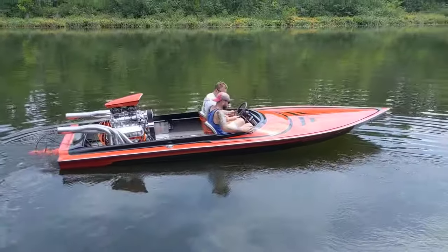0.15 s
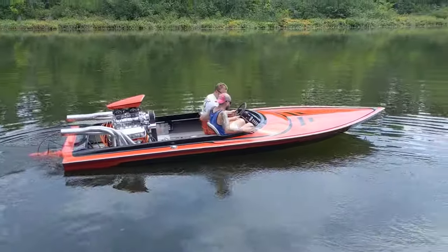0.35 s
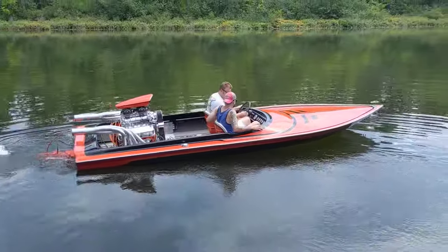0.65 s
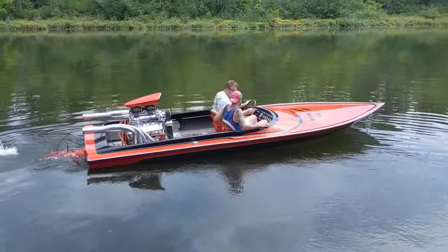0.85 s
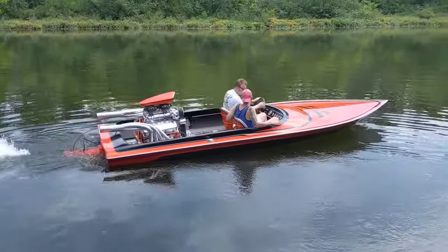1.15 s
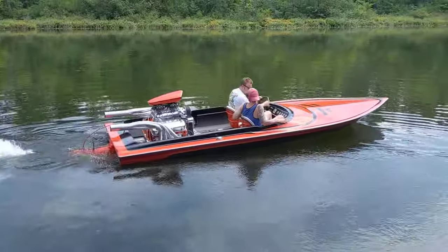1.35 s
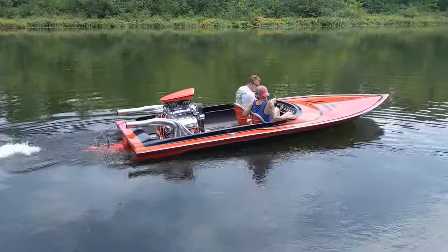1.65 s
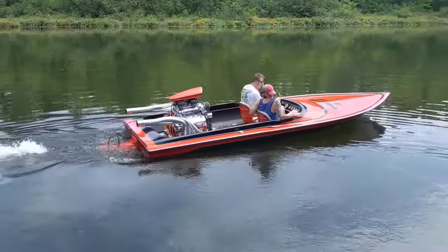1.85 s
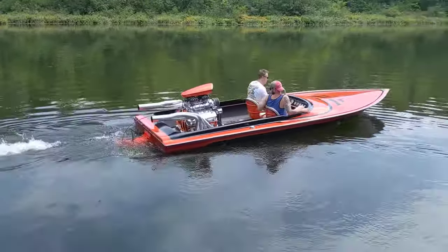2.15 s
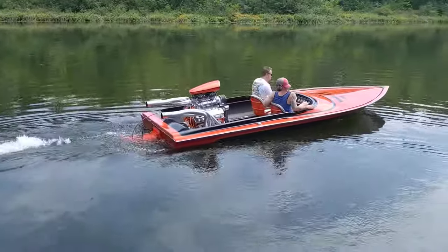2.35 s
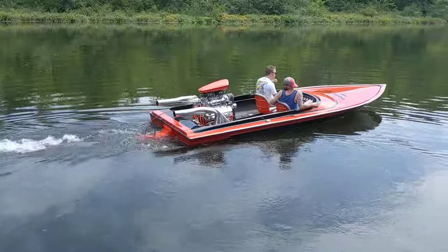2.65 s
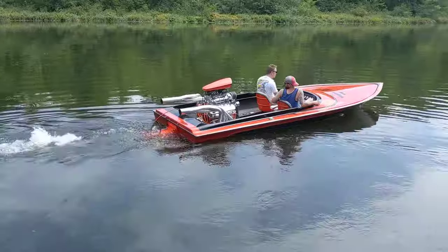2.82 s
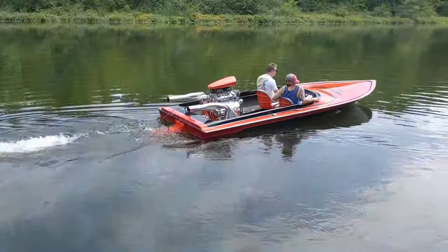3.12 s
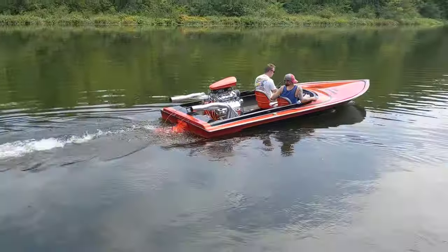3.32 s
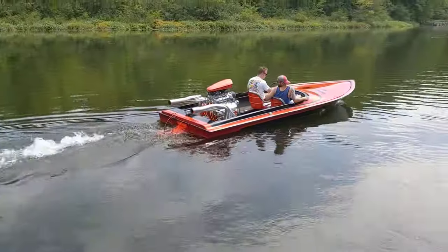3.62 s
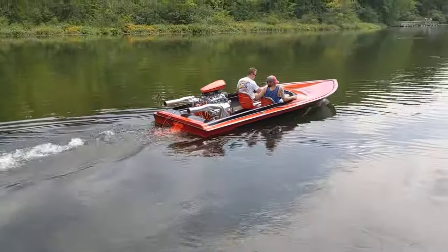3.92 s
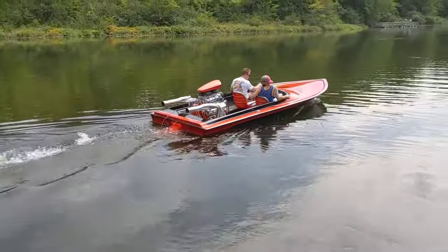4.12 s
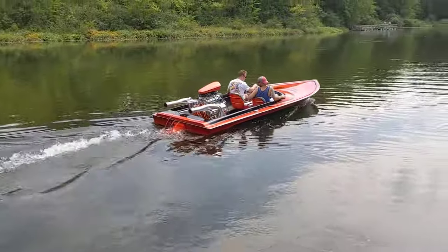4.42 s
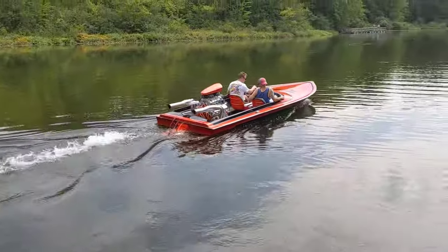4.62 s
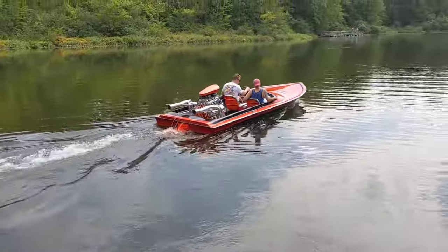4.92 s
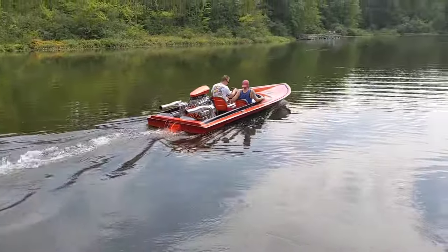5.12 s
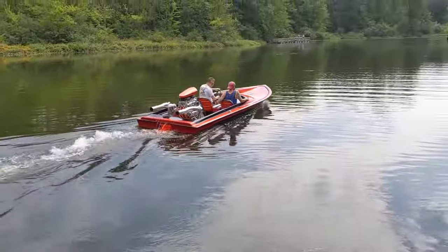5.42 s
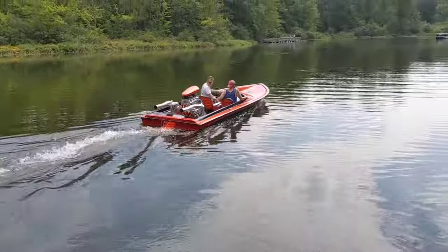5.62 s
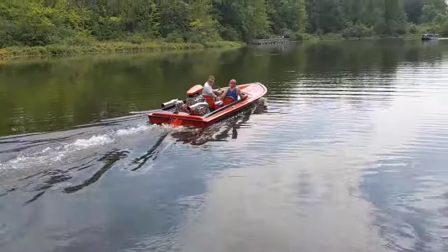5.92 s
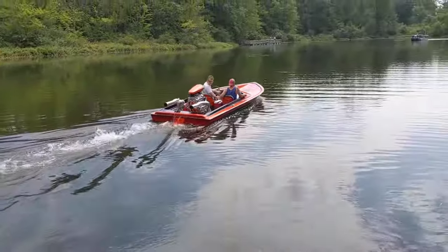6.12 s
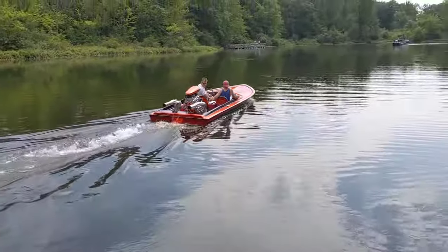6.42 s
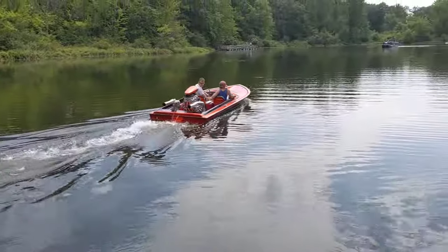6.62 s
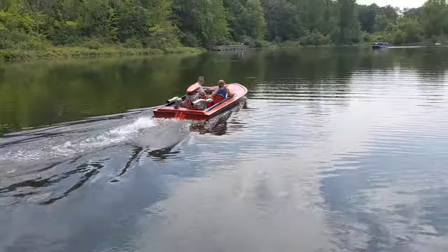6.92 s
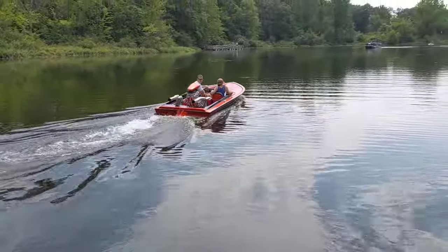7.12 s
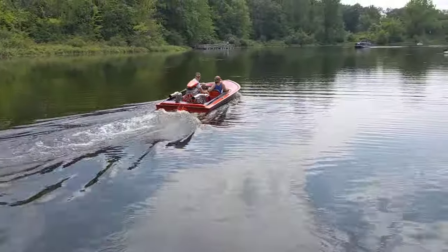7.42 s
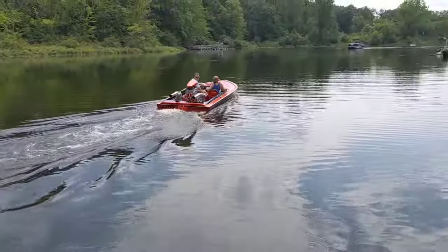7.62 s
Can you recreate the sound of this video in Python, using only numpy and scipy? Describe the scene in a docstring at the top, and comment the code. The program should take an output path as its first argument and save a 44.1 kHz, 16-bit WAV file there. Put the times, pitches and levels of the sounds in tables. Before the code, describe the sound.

A supercharged V8 speedboat idles past on a calm lake, its open exhausts booming unevenly with throaty, hissing chuffs as it turns away.

```python
"""Idling V8 speedboat turning away

A supercharged V8 with open exhaust pipes idles a speedboat past on a calm lake and turns away.
Eight unequal firings a cycle excite the exhaust resonances (a loping boom), the headers (a throaty
bark) and turbulent gas jets (hissing chuffs). As the stern swings round, the pipes point at the
microphone and the chuffs grow stronger and change colour. A faint breeze rumbles underneath.
"""
import sys
import numpy as np
from scipy import signal
from scipy.fft import rfft, irfft, next_fast_len
from scipy.io import wavfile
from scipy.ndimage import uniform_filter1d

SR = 44100
rng = np.random.default_rng(int(sys.argv[2]) if len(sys.argv) > 2 else 0)


def store_wav(level_fs):
    """Save 16-bit WAV to argv[1]."""
    pcm = np.round(np.clip(np.atleast_2d(level_fs), -1, 1) * 32767)
    wavfile.write(sys.argv[1], SR, pcm.T.astype(np.int16))


N = 342216

# Aspect of the boat. Each row: time in seconds, view (0 side-on, 1 from the quarter, 2 from astern).
VIEW = [(0, 0.11), (1.2, 0.15), (2.4, 1), (3.4, 1.16), (4.2, 1.36), (5, 1.893), (7.76, 1.945)]
# Cylinders in firing order. Each row: place in the cycle in firings, then the relative levels
# of boom, bark and chuff in dB.
CYLINDERS = [(0.269, 0.5, 0, -2), (1.13, -1, -1, -0.3), (2.288, 4, -3, 0.5), (3.233, 0.6, -1.5, -2.5),
             (4.138, 0.5, 0.5, 1), (5.239, 5.5, -1, 1), (6.066, 0.1, 1.5, 3.5), (7.092, 2, 0.5, 0)]
# Firings whose chuff stands out, nearly all harder. Each row: time in seconds, extra level in dB.
SPITS = [(2.05, -2), (2.64, 5.5), (2.785, 4), (3.208, 6), (4.025, 3.5), (6.124, 3), (6.323, 4.5),
         (6.458, 4), (6.769, 4.5), (7.499, 7.5), (7.59, 5.5)]
# Surges of the idle. Each row: time of the crest in seconds, extra firings per second.
SURGES = [(.298, 1.046), (.88, .764), (1.752, 2.008), (2.708, 4.865), (3.512, 2.101), (4.849, 1.356),
          (5.759, 1.986), (6.803, 1.511), (7.346, 1.028)]

# Low exhaust resonances. Each row: centre in Hz, width in Hz, relative gain in dB, signed weight.
PIPE_MODES = [(60.2, 26.83, -19.5, -0.961), (77.04, 30.13, -21.5, 0.98), (229.4, 8.04, -27, 1)]
# Colour of the header ring. Each row: frequency in Hz, relative gain in dB.
HEADER_COLOUR = [(30, -70), (80, -49), (120, 4.5), (160, 5), (200, -13), (265, 3.5), (300, -16), (400, -47)]
# Boom radiated in each view. Each row: frequency in Hz, relative gain in dB.
BOOM_SIDE = [(30, -16), (48, -2.5), (100, 0), (200, -1.5)]
BOOM_QUARTER = [(30, -16), (50, -4), (86, -0.5), (120, 12), (200, 2.5)]
BOOM_ASTERN = [(30, -20), (52, -8), (86, 2.5), (120, 6), (200, 1.5)]

# Colour of the bark in each view. Each row: frequency in Hz, relative gain in dB.
BARK_SIDE = [(90, -25), (200, 13), (290, -17), (340, 6.5), (420, 4.5), (510, -24), (680, -0.5), (850, -9),
             (1150, -15), (1450, -30), (2200, -57), (4000, -51)]
BARK_QUARTER = [(90, -30), (200, 5), (290, -3.5), (360, -20), (425, 7.5), (490, -1), (590, -1),
                (750, -12.5), (870, -8.5), (1150, -5.5), (1450, -12.5), (2200, -42), (4000, -58)]
BARK_ASTERN = [(90, -30), (200, 1), (290, -2), (370, -5.5), (490, -18.5), (590, -3.5), (680, 1), (715, 9),
               (755, -0.5), (860, -6), (1100, -24), (1450, -34), (2200, -20), (4000, -54)]
# Bark over time, weakest in mid-turn. Each row: time in seconds, level in dB.
BARK_LEVEL = [(0, -26.5), (2.4, -30.5), (3.9, -34), (5, -31), (5.9, -29.5), (7.76, -29)]

# Gas jet resonances in each view. Each row: centre in Hz, width at half amplitude in Hz,
# relative left gain in dB, relative right gain in dB.
JET_SIDE = [(1580, 100, -2, -44), (2670, 590, -0.5, -3.5), (3230, 790, -27, -2.5), (4040, 390, 5, 0.5),
            (4820, 530, 2.5, 3.5), (5700, 1700, -0.5, -10), (7470, 530, 3, -9), (8300, 360, 0.5, -9),
            (9640, 1400, -1.5, -4), (11550, 1300, -10, -6), (13400, 1600, -14, -11)]
JET_QUARTER = [(1720, 440, 1, -5), (2537, 450, -2.5, -0.5), (3245, 420, 2, -6), (3840, 610, -1, -1.5),
               (4710, 360, 6, -14), (5516, 600, 2, -4), (7600, 660, 4.5, -1), (7850, 1400, -1, -21),
               (9400, 1740, 1.5, -9), (11240, 850, -5.5, -11), (13700, 2700, -16, -21)]
JET_ASTERN = [(1600, 990, -27, -25), (2432, 230, -1.5, -1), (2660, 380, -2.5, 0), (3020, 170, 0.5, -28),
              (3500, 760, -10, -12.5), (4460, 510, -4, -3), (5374, 450, 3.5, -11), (6130, 520, -1, -6),
              (8500, 2160, -9.5, -11.5), (9800, 1100, -5.5, -10), (11370, 1100, -13, -12.5),
              (13240, 3800, -16, -14)]
# Hollows in the hiss, one row for each view. # Each row: centre in Hz, distance in Hz at which the dB depth
# falls to 1/e, gain at the centre in dB.
HOLLOWS = [(5280, 200, -1.5), (2240, 125, -4), (3980, 200, -1)]

# Low sounds at two microphone ports. Each row: frequency in Hz, left minus right level in dB,
# radians by which the left lags.
PORT_DIFFERENCE = [(30, 1.1, .35), (85, 1.5, .5), (230, 3.7, .98), (400, 6, 1.2), (700, 6.5, 1.15),
                   (1300, 5.5, .4), (2400, 1, 0)]
# Light air on the microphone. Each row: frequency in Hz, relative gain in dB.
BREEZE_COLOUR = [(8, -15), (22, 2), (40, 8), (70, -18), (200, -44)]

# idle speed, its slow creep as the engine clears, and the part of a firing before the first cycle
IDLE_HZ, CREEP_HZ_PER_S, START_FIRINGS = 85.886, 0.153, 0.43
# the blown engine hunts: each surge climbs quickly and sags back more slowly
SURGE_RISE_S, SURGE_FALL_S = 0.197, 0.306
# the boom spreads all round, so it only fades as the boat draws away
BOOM_DB, RECEDE_DB_PER_S = -11, 0.63
# the chuffs are beamed along the pipes: level side-on, gain for each step of the view
CHUFF_DB, BEAM_DB = -29.5, 2
# the pipes sweep across the microphone: moment, distance at which the extra dB falls to 1/e, extra level
AIM_S, AIM_WIDTH_S, AIM_DB = 6.1, 0.34, 2.5
TOP_HZ = 15900  # upper band limit of the output


def firing_rate():
    """Engine hunting: firings per second creep upwards, with triangular surges added."""
    t = np.arange(N) / SR
    surges = sum(np.interp(t - crest, [-SURGE_RISE_S, 0, SURGE_FALL_S], [0, extra, 0])
                 for crest, extra in SURGES)
    return IDLE_HZ + CREEP_HZ_PER_S * t + surges


def firings():
    """Crankshaft phase: the integral of the firing rate fixes the time and cylinder of each firing."""
    fired = np.cumsum(firing_rate()) / SR - START_FIRINGS
    cycle, cylinder = np.divmod(np.arange(int(fired[-1])), len(CYLINDERS))
    places = len(CYLINDERS) * cycle + np.transpose(CYLINDERS)[0][cylinder]
    times = np.interp(places, fired, np.arange(N) / SR)
    return times, cylinder


def train(times, sizes_db, shapes, scatter_db, jitter):
    """Superposition: one shape per firing, with random size (dB) and time (s), summed to rms 1."""
    early, size = rng.standard_normal((len(times), 2)).T
    start = np.clip((times + jitter * early) * SR, 0, N).astype(int)
    where = start[:, None] + np.arange(shapes.shape[-1])
    pulses = amp(sizes_db + scatter_db * size)[:, None] * shapes
    return unit(np.bincount(where.ravel(), pulses.ravel(), N)[:N])


def blowdown(rise, decay):
    """Valve blowdown: an exhaust valve opens fast and the pressure drains away (times in s)."""
    t = np.arange(SR // 25) / SR
    return (1 - np.exp(-(t / rise) ** 2)) * np.exp(-t / decay)


def header_voices(times, cylinder, sizes_db, decay, jitter):
    """Fixed impulse response: each cylinder's own header rings with the same waveform every cycle."""
    shape = blowdown(rise=0.00063, decay=decay)
    voices = shape * rng.standard_normal((len(CYLINDERS), len(shape)))
    return train(times, sizes_db, voices[cylinder], scatter_db=1.5, jitter=jitter)


def pipe(hz):
    """Modal sum: the exhaust responds as a few damped resonators in parallel."""
    return sum(weight * amp(db) * 1j * hz * width / (centre * centre - hz * hz + 1j * hz * width)
               for centre, width, db, weight in PIPE_MODES)


def boom(times, cylinder, view, lead=0.00143, header_db=-16):
    """Forced resonance: pressure pulses ring the exhaust, and their uneven spacing makes it lope."""
    sizes_db = np.transpose(CYLINDERS)[1][cylinder]
    # the pulses come `lead` seconds ahead of the firing marks
    pulses = train(times - lead, sizes_db, np.ones(1), scatter_db=0.73, jitter=0.00009)
    exhaust = filtered(pulses, lambda hz: pipe(hz) * port_response(hz))
    radiated = 0
    for k, colour in enumerate((BOOM_SIDE, BOOM_QUARTER, BOOM_ASTERN)):
        weight = np.clip(1 - abs(view - k), 0, 1)
        radiated = radiated + weight * filtered(exhaust, lambda hz: amp(along(colour, hz)))
    ring = header_voices(times, cylinder, sizes_db, decay=0.016, jitter=0.0003)
    ring = filtered(ring, lambda hz: amp(along(HEADER_COLOUR, hz)) * port_response(hz))
    return unit(radiated) + amp(header_db) * unit(ring)


def bark(times, cylinder, view, lead=0.00347, turbulence_db=-1, wash_db=-4):
    """Source and filter: header voice, pulsed turbulence and a wash from the shore, coloured by view."""
    sizes_db = np.transpose(CYLINDERS)[2][cylinder]
    voiced = header_voices(times - lead, cylinder, sizes_db, decay=0.01, jitter=0.00006)
    pulse = blowdown(rise=0.0014, decay=0.0085)
    beat = train(times - lead, sizes_db, pulse, scatter_db=1.4, jitter=0.0004)
    turbulence = beat * noise_pair(0.97)
    wash = noise_pair(0.9)
    gas = voiced + amp(turbulence_db) * turbulence + amp(wash_db) * wash
    views = [filtered(gas, lambda hz: amp(along(colour, hz)) * port_response(hz))
             for colour in (BARK_SIDE, BARK_QUARTER, BARK_ASTERN)]
    return turning(views, view)


def eddies(x, patchy_db):
    """Turbulent patchiness: random gain in patches of about 10 ms by 900 Hz colours each puff."""
    spectrum = signal.stft(x, nperseg=256)[2]
    field = rng.standard_normal(spectrum.shape[1:])
    field = uniform_filter1d(field, size=5, axis=0)  # across frequency
    field = uniform_filter1d(field, size=4, axis=1)  # across time
    gain = amp(patchy_db * unit(np.tanh(unit(field))))
    return unit(signal.istft(spectrum * gain, nperseg=256)[1][:, :N])


def jet(resonances, hz, twist=1.92, ripple_hz=230):
    """Jet resonance and path difference: short waves reach the two ports out of step."""
    power = sum((amp([[left_db], [right_db]]) / (1 + (2 * (hz - centre) / width) ** 2)) ** 2
                for centre, width, left_db, right_db in resonances)
    # the phase between the ports swings with frequency, up to `twist` radians
    half = twist / 2 * np.minimum(hz / 4500, 1) * np.sin(hz / ripple_hz)
    return np.sqrt(power) * np.exp(1j * np.array([half, -half]))


def hollow(centre, width, depth_db, hz):
    """Destructive interference: the gain of a rounded notch."""
    return amp(depth_db * np.exp(-((hz - centre) / width) ** 2))


def chuffs(times, cylinder, view, lead=0.0024, steady_side=0.46, steady_astern=0.16):
    """Modulated jet noise: a hissing burst per firing over the steady rush of blower and spray."""
    sizes_db = np.transpose(CYLINDERS)[3][cylinder]
    for s, extra_db in SPITS:
        sizes_db[np.argmin(abs(times - s))] += extra_db
    pulse = blowdown(rise=0.0019, decay=0.0024)
    beat = train(times - lead, sizes_db, pulse, scatter_db=1.5, jitter=0.00015)
    # share of power given to the rush
    steady = np.clip(steady_side + (steady_astern - steady_side) * view / 2, 0, 1)
    bursts = beat * eddies(noise_pair(0.58), patchy_db=5.0)
    rush = eddies(noise_pair(0.8), patchy_db=3.0)
    # the rush is duller than the bursts
    rush = filtered(rush, lambda hz: amp(along([(2000, 6.5), (5000, -0.5), (10000, -1.5)], hz)))
    bursts = filtered(bursts, lambda hz: amp(along([(1700, -4.0), (4000, 1)], hz)))
    gas = np.sqrt(1 - steady) * bursts + np.sqrt(steady) * rush
    views = [filtered(gas, lambda hz: jet(modes, hz) * hollow(*notch, hz))
             for modes, notch in zip((JET_SIDE, JET_QUARTER, JET_ASTERN), HOLLOWS)]
    return turning(views, view)


def breeze(level_db=-54):
    """Wind noise: low-frequency random pressure makes a faint rumble under the engine."""
    return amp(level_db) * unit(filtered(noise_pair(0.9), lambda hz: amp(along(BREEZE_COLOUR, hz))))


def port_response(hz):
    """Interaural-style difference: level and phase of the low sounds at the left and right ports."""
    rows = np.array(PORT_DIFFERENCE)
    half_db = along(rows[:, [0, 1]], hz) / 2
    half_lag = along(rows[:, [0, 2]], hz) / 2
    return amp([half_db, -half_db]) * np.exp(1j * np.array([-half_lag, half_lag]))


def turning(sounds, view):
    """Directivity: the views, each scaled to rms 1, cross-fade with square-root weights."""
    return sum(np.sqrt(np.clip(1 - abs(view - k), 0, 1)) * unit(x) for k, x in enumerate(sounds))


def noise_pair(alike):
    """Coherence: white noise in two channels with the given correlation."""
    a, b = rng.standard_normal((2, N))
    turn = np.arccos(np.clip(alike, -1, 1)) / 2
    return np.cos(turn) * a + np.sin(turn) * np.array([b, -b])


def filtered(x, response):
    """Linear filtering: the spectrum of x times a response of frequency."""
    m = next_fast_len(N + 16384, True)  # padded with silence
    return irfft(rfft(x, m) * response(np.fft.rfftfreq(m, 1 / SR)), m)[..., :N]


def along(points, hz):
    """Logarithmic pitch: (Hz, value) points interpolated on a log frequency axis."""
    f, v = np.transpose(points)
    return np.interp(np.log(hz + 1), np.log(f + 1), v)


def curves(rows):
    """Linear interpolation: one value per sample for each column after the time."""
    s, *cols = np.transpose(rows)
    return [np.interp(np.arange(N) / SR, s, c) for c in cols]


def amp(db):
    """Level: decibels to amplitude gain."""
    return 10 ** (np.asarray(db) / 20)


def unit(x):
    """Mean power: scale to rms 1."""
    return x / np.sqrt(np.mean(x ** 2) + 1e-20)


def scene():
    """Common excitation: one crankshaft drives the engine layers; distance and aim set their levels."""
    t = np.arange(N) / SR
    times, cylinder = firings()
    view = np.clip(curves(VIEW)[0], 0, 2)
    boom_db = BOOM_DB - RECEDE_DB_PER_S * t
    bark_db = curves(BARK_LEVEL)[0]
    aim_db = AIM_DB * np.exp(-((t - AIM_S) / AIM_WIDTH_S) ** 2)
    chuff_db = CHUFF_DB + BEAM_DB * view + aim_db
    return (amp(boom_db) * boom(times, cylinder, view)
            + amp(bark_db) * bark(times, cylinder, view)
            + amp(chuff_db) * chuffs(times, cylinder, view)
            + breeze())


def record(dry, ceiling=0.7, hardness=6):
    """Saturation and band limiting: the microphone rounds off tall peaks; nothing above TOP_HZ is kept."""
    rounded = dry / (1 + abs(dry / ceiling) ** hardness) ** (1 / hardness)
    return filtered(rounded, lambda hz: hz < TOP_HZ)


dry = scene()
out = record(dry)
store_wav(out)
```